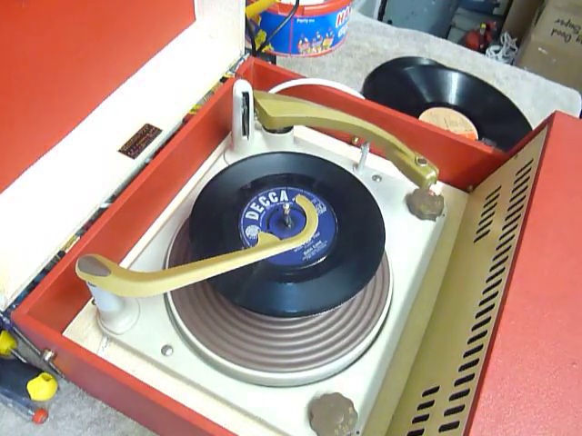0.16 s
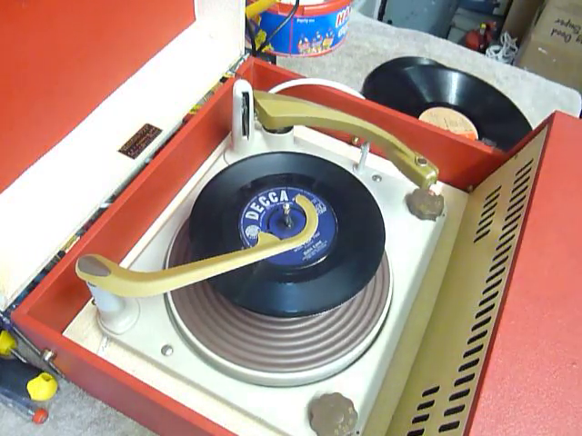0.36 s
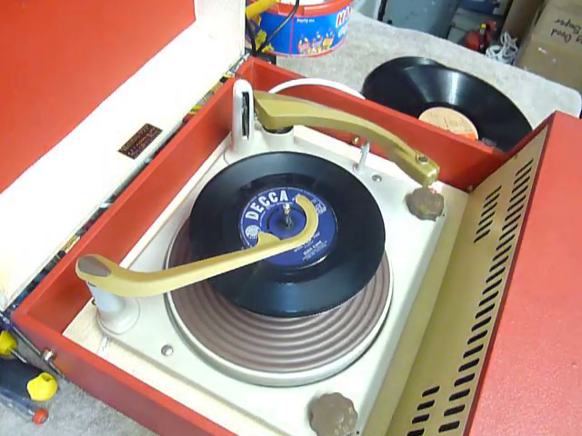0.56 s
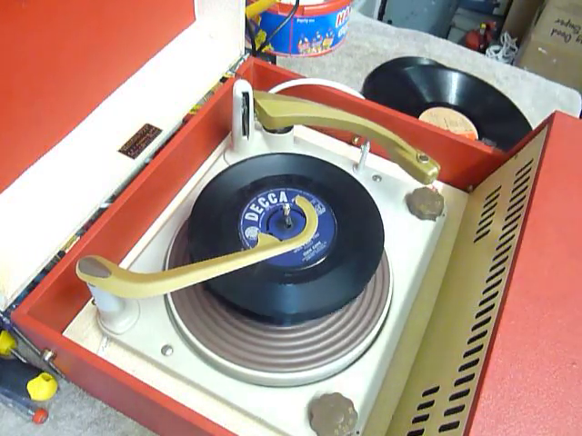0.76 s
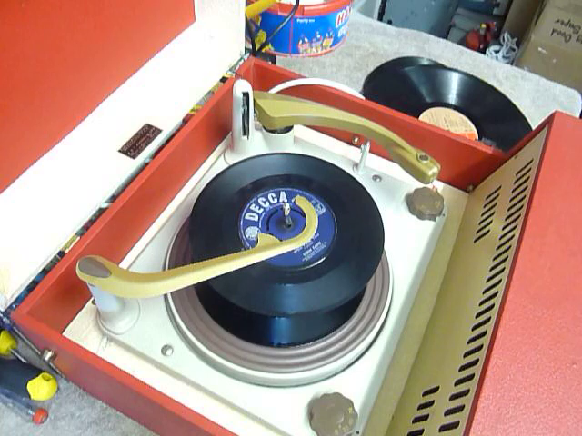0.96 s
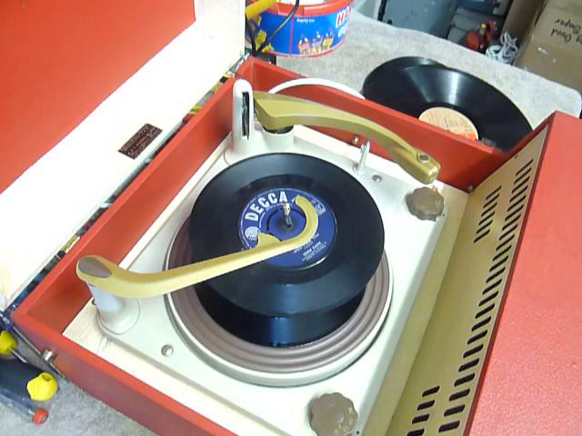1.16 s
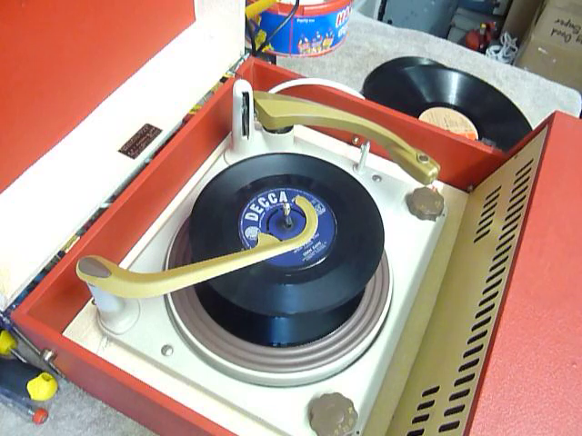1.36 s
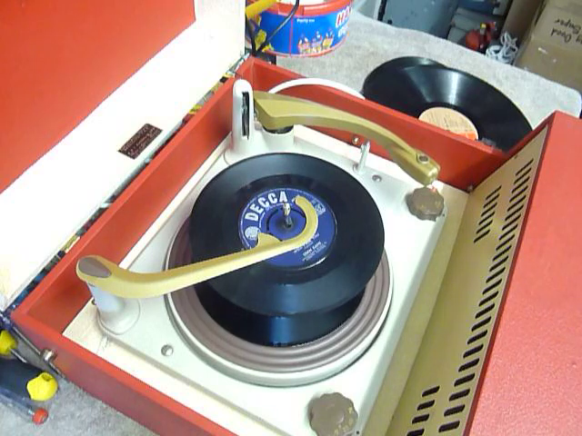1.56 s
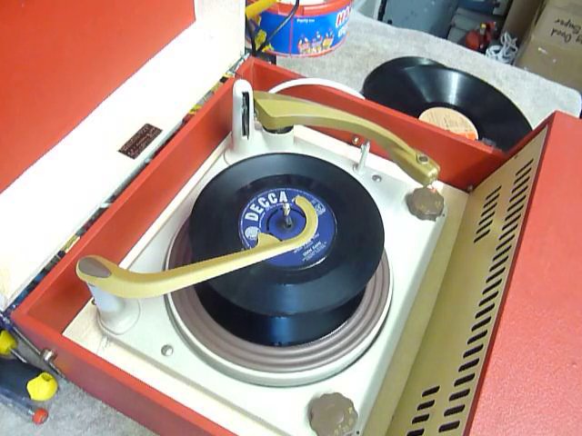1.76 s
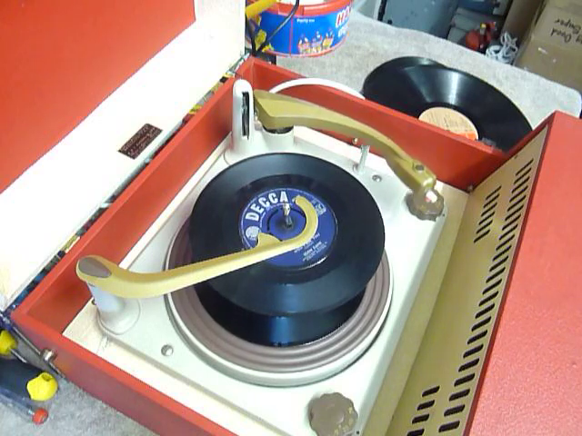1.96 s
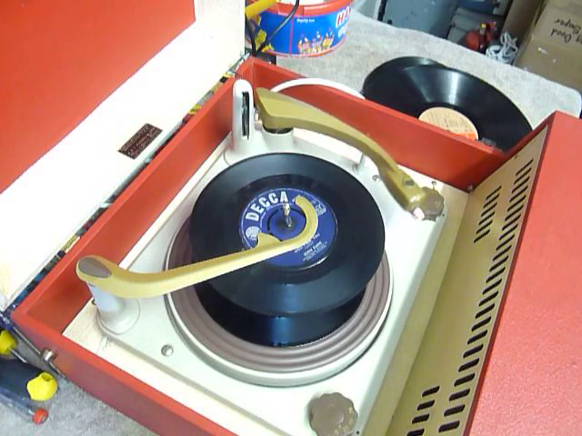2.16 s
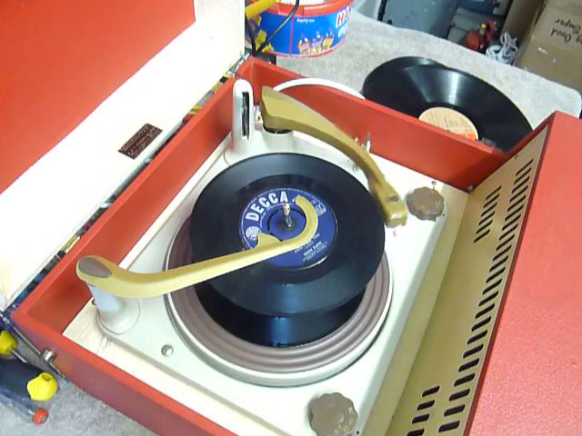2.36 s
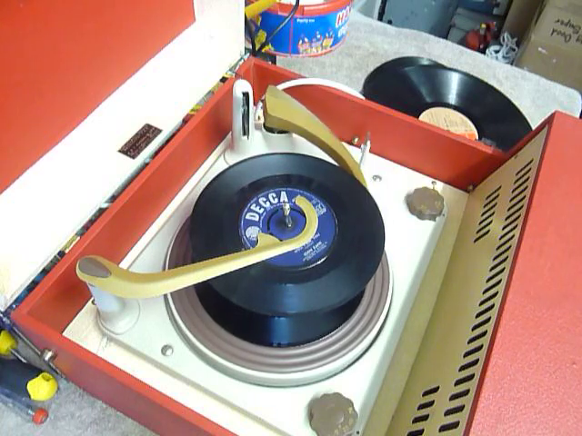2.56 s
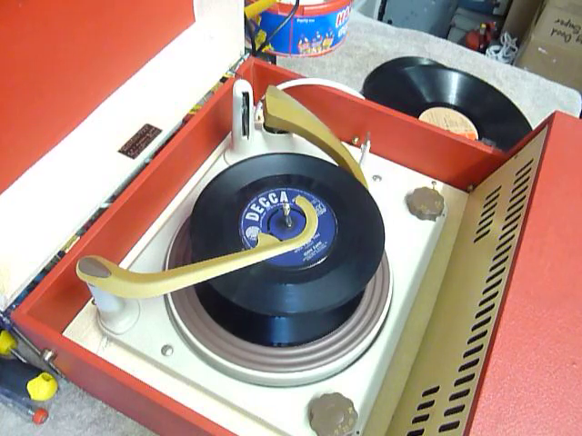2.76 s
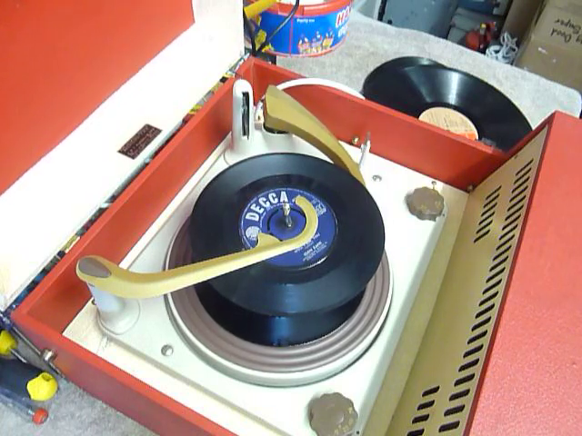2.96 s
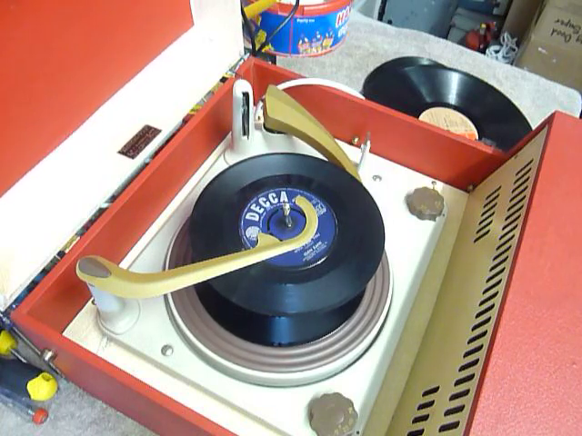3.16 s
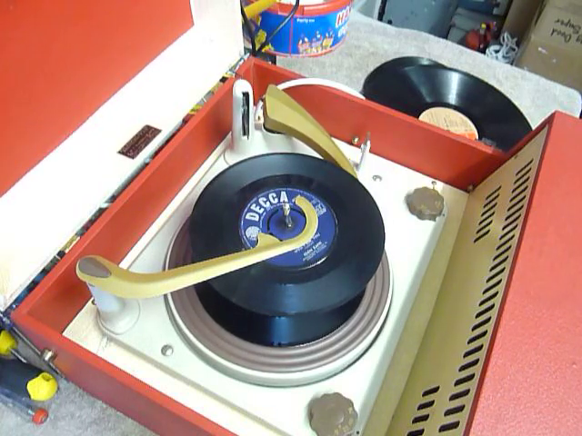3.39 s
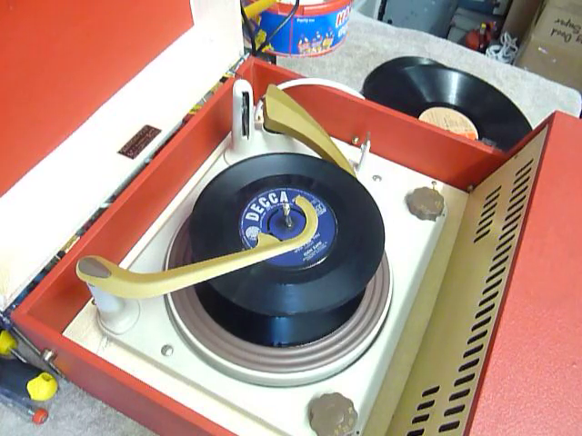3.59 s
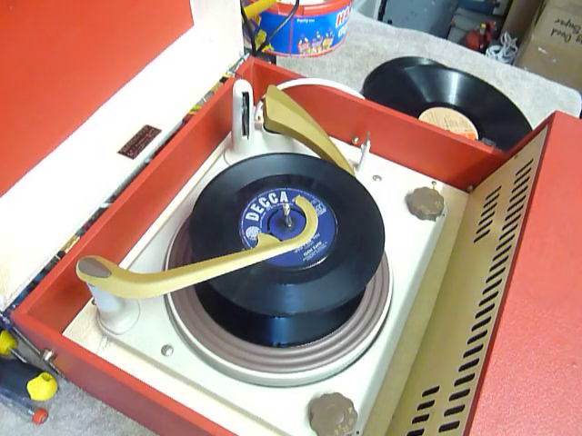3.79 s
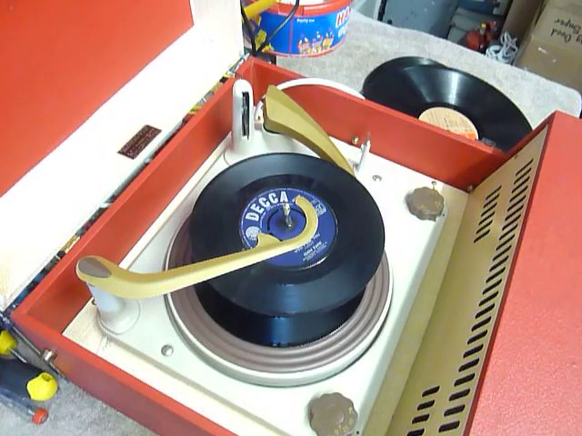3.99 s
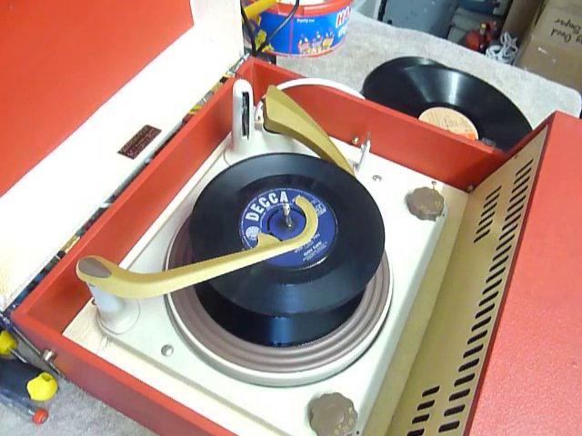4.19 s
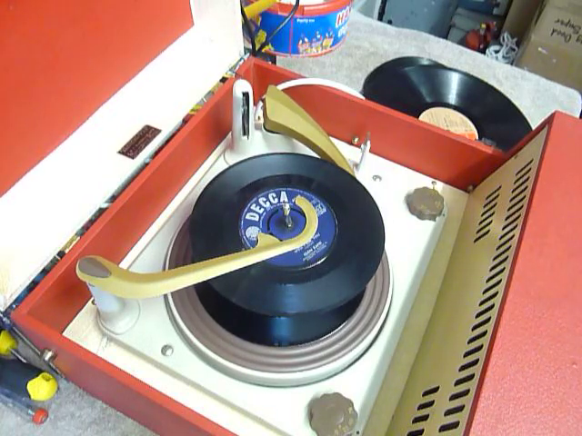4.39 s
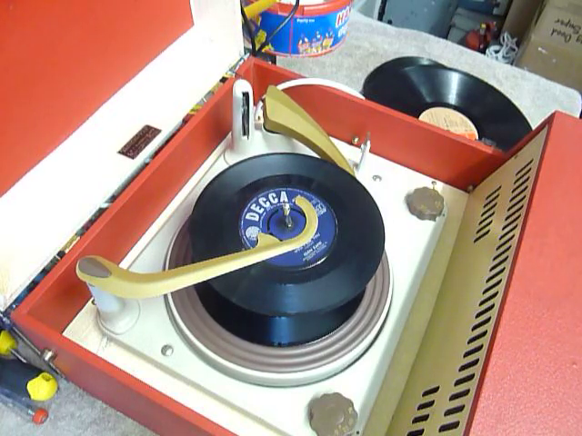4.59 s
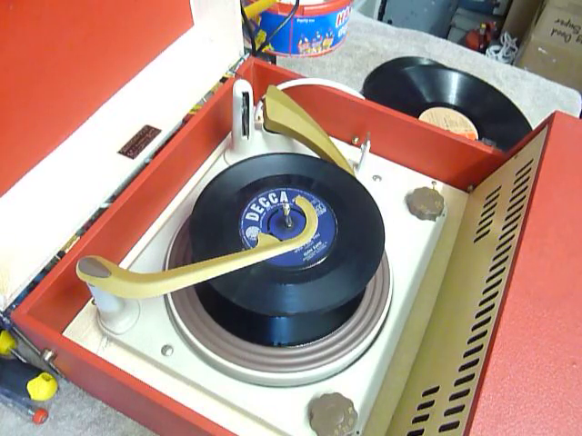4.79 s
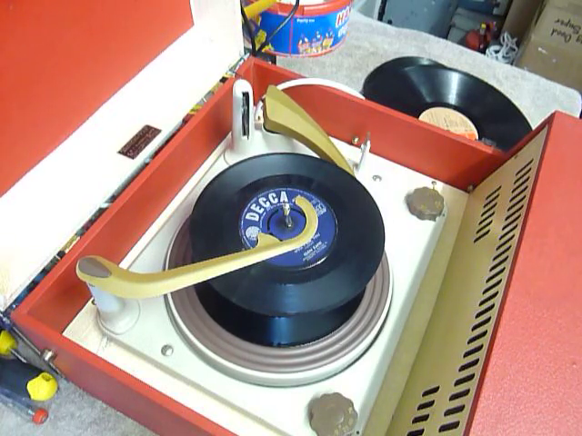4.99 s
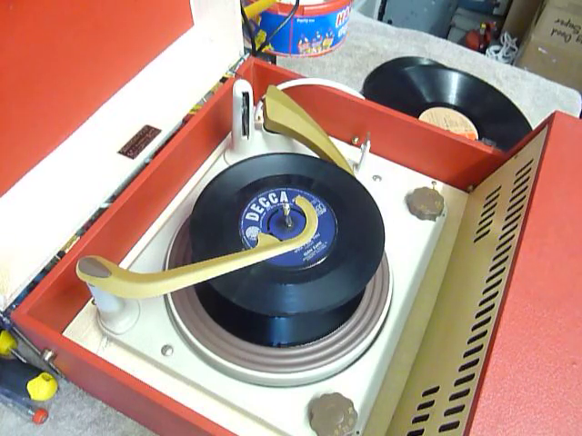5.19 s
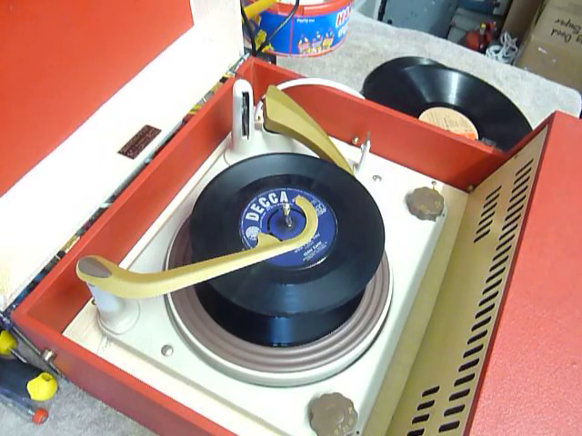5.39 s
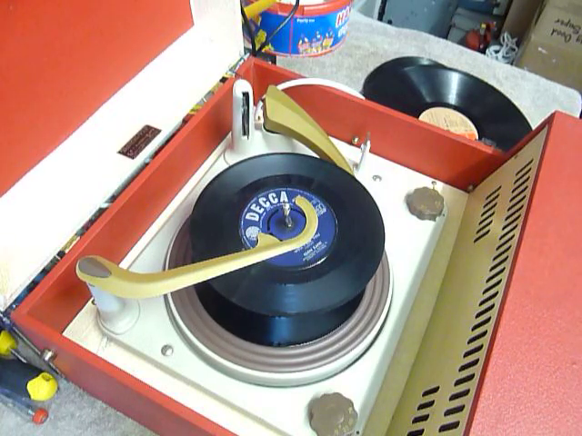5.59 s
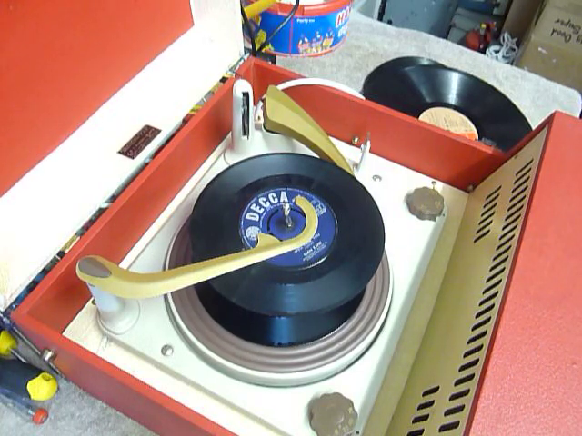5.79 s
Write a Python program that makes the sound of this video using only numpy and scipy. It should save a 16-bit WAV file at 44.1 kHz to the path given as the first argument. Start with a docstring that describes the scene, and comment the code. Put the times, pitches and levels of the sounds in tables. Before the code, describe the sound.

Light mechanical clicks, the slap of a falling record and a sharp lever clunk sound over an automatic record player's faint rumble.

```python
"""A record player changing discs

Over mains hum and bearing rumble, a cam gear ticks and rubs, louder whenever it takes up a load.
Levers click and latches snap on the sprung steel deck, a record slaps onto the platter, the main
lever clunks and the tone arm sets down with a soft knock. Each impact is a brief broadband force,
filtered by the resonant modes of the part it strikes."""
import sys
import numpy as np
from scipy import signal
from scipy.fft import rfft, irfft
from scipy.io import wavfile
from scipy.ndimage import uniform_filter1d

SR = 44100
rng = np.random.default_rng(int(sys.argv[2]) if len(sys.argv) > 2 else 0)


def dump_mix(stems):
    """Bounce the given channels to the path in sys.argv[1] as a 16-bit WAV at rate SR."""
    frames = np.atleast_2d(stems).T  # one column per channel
    limited = np.clip(frames, -1, 1)  # hard clip at full scale
    pcm = np.round(limited * 32767).astype(np.int16)
    wavfile.write(sys.argv[1], SR, pcm)


N = 257984

# spectral envelope of the turntable and room noise: frequency_hz, gain_db
RUMBLE_SPECTRUM = [(30, -25), (65, -17), (120, -11), (230, -9), (300, -13), (500, -14.5), (780, -17.5),
                   (1500, -23), (3000, -28), (6500, -34), (7600, -38), (8300, -46.5), (8900, -63.5)]
# partials of the motor hum: harmonic_number, level_db, waver_db
HUM_HARMONICS = [(1, -82, 2.5), (2, -67.5, -3), (3, -55, -0.17), (4, -62, 1), (6, -69, 2.5)]
# the cam's jobs (take up the levers, push the record off, lift the arm, swing it in):
# peak_s, half_length_s, rub_db, tooth_db
CAM_STROKES = [(.4, 0.41, -55.5, -67.5), (0.796, .05, -50.5, -53), (1.825, 0.25, -60.5, -55),
               (3.238, 0.41, -60.5, -51)]
# spectral envelope common to all impacts: frequency_hz, gain_db
IMPACT_SPECTRUM = [(60, -17), (230, -8), (330, -1.5), (700, 2.5), (1200, 2.5), (2000, -1.5), (3500, -3),
                   (5000, -3.5), (6600, -5.5), (7500, -13.5), (8600, -30.5)]
# modes of the deck in its case: pitch_hz, width_hz, gain_db
DECK_MODES = [(356, 93, 10), (495, 38, 4), (812, 36, 6), (908, 72, 7), (1200, 47, 10.5), (1480, 56, -4.5),
              (1700, 76, 4.5), (2320, 130, 3.5), (2980, 230, 5), (3305, 28, 8), (4260, 31, 0),
              (4700, 44, -5), (5230, 36, -2.5), (5920, 210, 2.5), (7000, 60, -0.5)]
# modes of the greased cam gear: pitch_hz, width_hz, gain_db
GEAR_MODES = [(890, 160, 10.5), (1220, 210, 10.5)]
# modes of the tone arm: pitch_hz, width_hz, gain_db
ARM_MODES = [(334, 38, 17), (637, 130, 5.5), (1150, 33, 18), (3060, 180, 18.5), (4240, 150, 16)]
# modes of the record on the platter: pitch_hz, width_hz, gain_db
DISC_MODES = [(327, 37, 6.5), (373, 26, 9), (496, 29, 8.5), (724, 86, 14), (1010, 160, 7.5),
              (1220, 50, 5.5), (1460, 130, 9), (1630, 90, 7), (2020, 200, 10.5), (2540, 90, 8),
              (3030, 70, 5), (3240, 170, 4.5), (5090, 200, 6), (6220, 150, 6)]
# modes of the main lever on the deck: pitch_hz, width_hz, gain_db
MAIN_LEVER_MODES = [(350, 80, 7), (783, 50, 9), (910, 80, -0.5), (1194, 35, 12), (1690, 76, 5),
                    (1870, 90, 8.5), (2300, 130, 0.5), (3060, 3000, -6), (4650, 160, 5), (5610, 80, 2.5),
                    (6350, 180, 5.5)]
# levers meeting their stops: start_s, level_db, body_db, treble_db, crack_t60_s, ring_hz, ring_db
LEVER_CLICKS = [ (.0960, -46.5, 3, -2.5, 0.023, 950, 27), (0.149, -36.5, 3, -0.5, 0.053, 4240, 15),
                (0.1805, -40.5, 2, 1.5, 0.016, 330, 8), (.2400, -25, 0, 1.5, 0.024, 2900, 10),
                (0.2796, -38.5, 9, -9, 0.012, 1210, 10), (0.2898, -40.5, -6, 1.5, 0.075, 3320, 4),
                (0.339, -40.5, -8, -5.5, .039, 2880, 13.5), (0.5547, -30.5, 1, 1.5, 0.059, 1700, 8.5),
                (0.6096, -28, -9, -4.5, 0.037, 2790, 13), (.6280, -35.5, 0, -12, .06, 2980, 12),
                (0.6518, -40, 11, 2, .035, 1140, 16.5), (0.7403, -39, 2, -4, .04, 3320, 14.5),
                (0.75, -39.5, -4, 6, .05, 8070, 15), (.7660, -38, 9, -15, 0.085, 684, 7),
                (0.773, -38.5, -5, -5.5, .027, 2490, 12), (.7975, -41.5, 1, -2, 0.03, 650, 9),
                (1.6400, -43.5, -4, -5, 0.029, 1590, 9), (1.7000, -37.5, 3.5, -7.5, 0.037, 1450, 14),
                (1.8243, -36, -2, -4.5, 0.032, 1460, 10.5), (2.7230, -49.5, -2, -3, 0.027, 2220, 18),
                (2.7410, -34, -5, -11, 0.025, 1500, 7.5), (2.7712, -35, 1, -1.5, 0.076, 1160, 6.5),
                (3.422, -44, 1, -19, 0.024, 1110, 11), (5.4650, -45, -5, -14, 0.017, 900, 26), ]
# latches touching, then seating: seat_s, lead_s, touch_db, seat_db, body_db, treble_db, ring_hz, ring_db
LATCH_SNAPS = [ (0.4624, .0047, -36.5, -33, 1, 3.5, 900, 7), (.5418, 0.01, -42, -26.5, 5, 5, 886, 7),
               (3.858, .005, -38.5, -39.5, -4, 7.5, 830, 12), ]
# the record's rim touches, then it lands flat and settles: start_s, level_db, treble_db, crack_t60_s
DISC_CONTACTS = [(0.8652, -28, 8.5, 0.0077), (0.8703, -22, 4, 0.011), (0.8722, -23.5, 8.5, 0.0073),
                 (.8768, -31, 7.5, .019)]
# pressure pulses under the record's landing and the main lever's clunk: start_s, gain_db
PRESSURE_BUMPS = [(0.868, -45), (2.082, -25.5)]
# the main lever's drop and two bounces: start_s, level_db, body_db, crack_t60_s, tail_db
MAIN_LEVER_CONTACTS = [(2.0795, -22, -2, 0.021, -18.5), (2.1190, -41, -5, .03, -12),
                       (2.137, -45.5, -5, .03, -13)]

TOP_HZ, HIT_SAMPLES = 8500, 16384
RING_WIDTH_HZ = 115  # bandwidth of a lever's or latch's own mode
STEEL_TAIL_T60_S = 0.15  # decay of a steel part's reflections from case and room


def undb(db):
    """Amplitude ratio of a level in decibels."""
    return 10 ** (np.asarray(db) / 20)


def unit(x):
    """Normalisation to an rms of 1."""
    return x / np.sqrt(np.mean(x ** 2))


def fade(t, t60):
    """Exponential decay, 60 dB down after t60."""
    return np.exp(-np.log(1000) * t / t60)


def freqs(size):
    """Frequencies of the Fourier bins, kept above zero."""
    return np.maximum(np.arange(size // 2 + 1) * SR / size, 1)


def colour(points, size):
    """Minimum-phase response through (frequency_hz, gain_db) points, by folding the cepstrum."""
    hz, db = np.transpose(points)
    gain = undb(np.interp(np.log(freqs(size)), np.log(hz), db))
    cepstrum = irfft(np.log(gain), size)
    cepstrum[1:size // 2] *= 2
    cepstrum[size // 2 + 1:] = 0
    return np.exp(rfft(cepstrum))


def resonances(modes, size):
    """Second-order resonators in cascade: each sets a peak or a dip in a flat response."""
    f, response = freqs(size), 1
    for hz, width, db in modes:
        response = response * (1 + (undb(db) - 1) / (1 + 1j * hz / width * (f / hz - hz / f)))
    return response


def wander(rate_hz):
    """Low-pass random modulation: held random steps, smoothed twice, with an rms of 1."""
    hold = int(SR / rate_hz)
    steps = np.repeat(rng.standard_normal(N // hold + 1), hold)
    return unit(uniform_filter1d(uniform_filter1d(steps, hold), hold)[:N])


def add(track, start_s, sound):
    """Linear superposition of a sound on the track."""
    start = int(start_s * SR)
    track[start:start + len(sound)] += sound[:N - start]


def contact(crack_t60, tail_db, tail_t60, rise_s=0.0014, grit_db=4, even_hz=600, grain_samples=32):
    """Broadband excitation spectrum: a crack of micro-rattles, then reflections from case and room."""
    t = np.arange(HIT_SAMPLES) / SR
    crack, tail = rng.standard_normal((2, HIT_SAMPLES))
    # loose metal touches in brief grains of uneven strength
    grain_db = grit_db * rng.uniform(-1.3, 1.3, HIT_SAMPLES // grain_samples)
    grains = unit(np.repeat(undb(grain_db), grain_samples))
    burst = grains * crack * fade(t, crack_t60) + undb(tail_db) * tail * fade(t, tail_t60)
    spectrum = rfft((1 - np.exp(-t / rise_s)) * burst)
    # a hard contact feeds all bands evenly
    band_power = uniform_filter1d(np.abs(spectrum) ** 2, int(even_hz * HIT_SAMPLES / SR))
    return spectrum / np.sqrt(band_power)


def strike(modes, level_db, body_db, treble_db, crack_t60, tail_db, tail_t60,
           body_hz=480, treble_hz=3000, edge_hz=6500, span_s=0.0058):
    """Impact excitation of a body's modes; the level is the blow's energy spread over span_s."""
    response = colour(IMPACT_SPECTRUM, HIT_SAMPLES) * resonances(modes, HIT_SAMPLES)
    # heavy parts shake the case; hard edges add treble and soft ones lose it, most at the very top
    body = [(body_hz, body_db), (2 * body_hz, 0)]
    treble = [(treble_hz / 2, 0), (treble_hz * 1.26, treble_db),
              (edge_hz, treble_db), (TOP_HZ, 1.4 * treble_db)]
    shelves = colour(body + treble, HIT_SAMPLES)
    blow = irfft(contact(crack_t60, tail_db, tail_t60) * response * shelves)[:HIT_SAMPLES // 2]
    return blow * undb(level_db) / np.sqrt(np.sum(blow ** 2) / (span_s * SR))


def turntable(level_db=-55.5, flutter_db=0.5):
    """Bearing noise: a continuous spectrum of rumble and hiss with slight amplitude modulation."""
    noise = irfft(rfft(rng.standard_normal(N)) * colour(RUMBLE_SPECTRUM, N), N)
    return unit(noise) * undb(level_db + flutter_db * wander(20))


def motor(mains_hz=50, drift_rad=0.1):
    """Forced vibration at harmonics of the mains, each wavering in level and phase."""
    t, hum = np.arange(N) / SR, 0
    for harmonic, level_db, waver_db in HUM_HARMONICS:
        phase = 2 * np.pi * (harmonic * mains_hz * t + rng.random()) + drift_rad * wander(4.9)
        amplitude = np.sqrt(2) * undb(level_db + waver_db * wander(7.4))
        hum = hum + amplitude * np.sin(phase)
    return hum


def cam_levels(t, idle_rub_db=-64, idle_tooth_db=-63):
    """Power addition: each job lays a Gaussian swell over the idle rub and tooth levels, in dB."""
    power = undb([[idle_rub_db], [idle_tooth_db]]) ** 2
    for peak_s, half_length_s, rub_db, tooth_db in CAM_STROKES:
        swell = np.exp(-((t - peak_s) / half_length_s) ** 2)
        power = power + undb([[rub_db], [tooth_db]]) ** 2 * swell
    return 10 * np.log10(power)


def cam_friction(rough_db=2.5):
    """Sliding friction: the follower rubs unevenly along the cam and drives the deck's modes."""
    friction = rng.standard_normal(N) * undb(rough_db * wander(60))
    dull = colour([(100, -15.5), (300, 6.5), (1100, 0.5), (2200, -7.5), (5000, -21), (8500, -34)], N)
    rub = unit(irfft(rfft(friction) * dull * resonances(DECK_MODES, N), N))
    rub_db, _ = cam_levels(np.arange(N) / SR)
    return rub * undb(rub_db)


def gear_teeth(start_s=0.0105, end_s=3.8, period_s=0.0445, scatter_db=1.0):
    """Gear meshing: a periodic train of soft tooth impacts, stronger under load."""
    track = np.zeros(N)
    times = np.arange(start_s, end_s, period_s)
    _, tooth_db = cam_levels(times)
    for tick_s, level_db in zip(times, tooth_db + scatter_db * rng.standard_normal(len(times))):
        tick = strike(GEAR_MODES, level_db, body_db=-8, treble_db=-17,
                      crack_t60=0.042, tail_db=-25, tail_t60=0.18)
        add(track, tick_s, tick)
    return track


def tone_arm(start_s=4.1985, level_db=-37):
    """A soft contact excites high modes weakly: the arm meets the record with a dull, hollow knock."""
    track = np.zeros(N)
    knock = strike(ARM_MODES, level_db, body_db=4, treble_db=-15,
                   crack_t60=0.022, tail_db=-20, tail_t60=0.12)
    add(track, start_s, knock)
    return track


def levers(tail_db=-16.5):
    """Free vibration after impact: each lever hits its stop, ringing the deck and a mode of its own."""
    track = np.zeros(N)
    for start_s, level_db, body_db, treble_db, crack_t60, ring_hz, ring_db in LEVER_CLICKS:
        modes = [*DECK_MODES, (ring_hz, RING_WIDTH_HZ, ring_db)]
        click = strike(modes, level_db, body_db, treble_db, crack_t60, tail_db, STEEL_TAIL_T60_S)
        add(track, start_s, click)
    return track


def latches(touch_body_db=4, touch_treble_db=8.5, touch_t60=0.038, seat_t60=0.027, tail_db=-15):
    """Two-stage impact: each latch's tip ticks brightly against its catch, then the latch snaps home."""
    track = np.zeros(N)
    for seat_s, lead_s, touch_db, seat_db, body_db, treble_db, ring_hz, ring_db in LATCH_SNAPS:
        modes = [*DECK_MODES, (ring_hz, RING_WIDTH_HZ, ring_db)]
        touch = strike(DECK_MODES, touch_db, touch_body_db, touch_treble_db,
                       touch_t60, tail_db, STEEL_TAIL_T60_S)
        snap = strike(modes, seat_db, body_db, treble_db, seat_t60, tail_db, STEEL_TAIL_T60_S)
        add(track, seat_s - lead_s, touch)
        add(track, seat_s, snap)
    return track


def disc_landing(body_db=1, tail_db=-31, tail_t60=0.14):
    """Temporal fusion: the record's dry contacts with the platter, milliseconds apart, make one slap."""
    track = np.zeros(N)
    for start_s, level_db, treble_db, crack_t60 in DISC_CONTACTS:
        slap = strike(DISC_MODES, level_db, body_db, treble_db, crack_t60, tail_db, tail_t60)
        add(track, start_s, slap)
    return track


def pressure_bump(start_s, gain_db, rise_s=0.003, fall_s=0.024, rebound_s=0.067, rebound=0.16):
    """Low-frequency transient of a heavy blow: a quick compression, then a slow rarefaction."""
    t = np.maximum(np.arange(N) / SR - start_s, 0)
    compression = (1 - np.exp(-(t / rise_s) ** 2)) * np.exp(-t / fall_s)
    rarefaction = (t / rebound_s * np.exp(1 - t / rebound_s)) ** 2
    return undb(gain_db) * (compression - rebound * rarefaction)


def main_lever(treble_db=3):
    """Inelastic collision: the main lever drops with a hard clunk and makes two weaker, thin rebounds."""
    track = np.zeros(N)
    for start_s, level_db, body_db, crack_t60, tail_db in MAIN_LEVER_CONTACTS:
        clunk = strike(MAIN_LEVER_MODES, level_db, body_db, treble_db,
                       crack_t60, tail_db, STEEL_TAIL_T60_S)
        add(track, start_s, clunk)
    return track


def scene():
    """Superposition of the running noise and the impacts in one channel."""
    running = motor() + turntable() + cam_friction() + gear_teeth()
    impacts = levers() + latches() + disc_landing() + main_lever() + tone_arm()
    bumps = sum(pressure_bump(start_s, gain_db) for start_s, gain_db in PRESSURE_BUMPS)
    return (running + impacts + bumps)[None]


def record(dry, offset=0.0068):
    """Band limiting: a small microphone loses the top octave and adds a slight steady offset."""
    lowpass = signal.ellip(8, 0.2, 70, TOP_HZ, fs=SR, output="sos")
    return signal.sosfilt(lowpass, dry) + offset


dry = scene()
out = record(dry)
dump_mix(out)
```